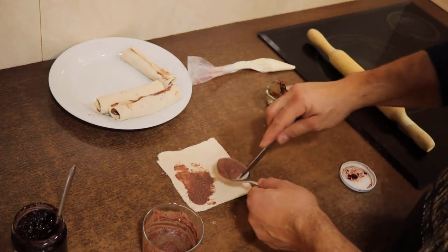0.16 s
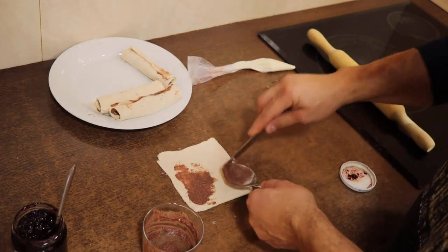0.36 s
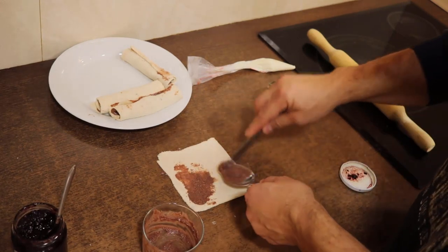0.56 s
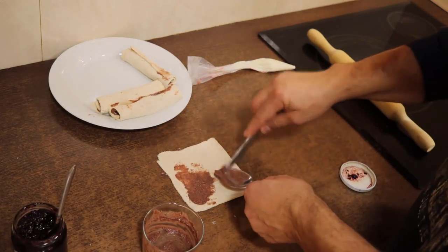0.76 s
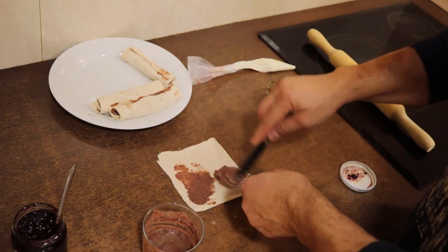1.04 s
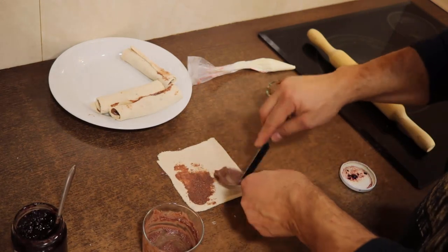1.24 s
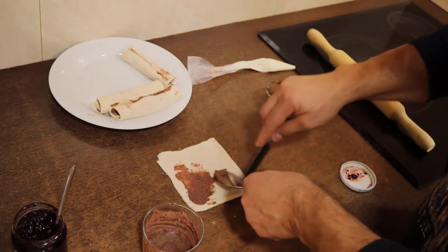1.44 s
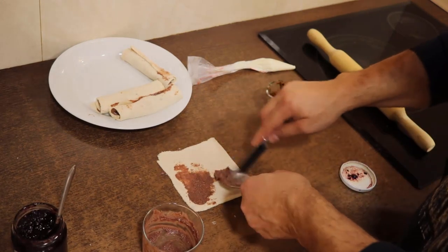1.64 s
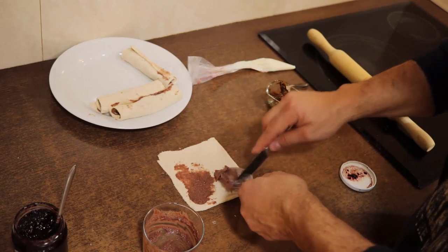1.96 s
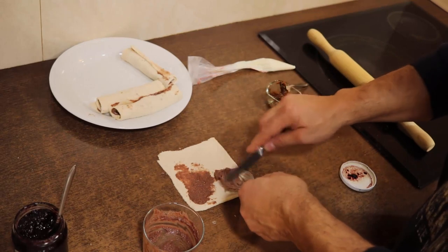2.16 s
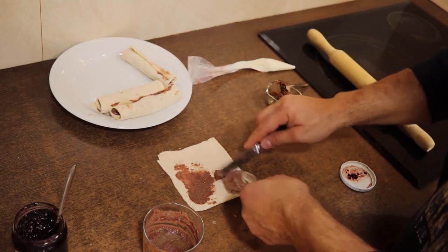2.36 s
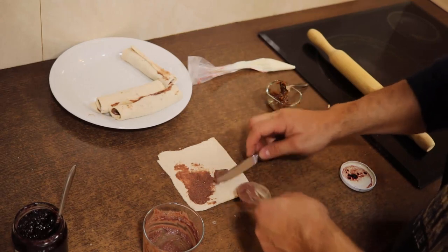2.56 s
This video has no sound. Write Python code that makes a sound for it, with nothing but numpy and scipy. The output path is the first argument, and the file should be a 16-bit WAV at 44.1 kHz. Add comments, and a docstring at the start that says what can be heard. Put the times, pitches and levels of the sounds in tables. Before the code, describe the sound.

Metal blade against hand-held spoon: a single clack and scrape, a brief pause, then a steady run of crisp, damped clacks with gritty drags; faint room rumble and hiss, hard-walled kitchen, close microphone.

```python
"""A knife taps and scrapes a spread off a hand-held metal spoon, over steady faint rumble and hiss.
First come faint taps and scrapes, a stronger tap and scrape at 0.2 s, then from half a second on
quick strokes, and last a soft slide. Each tap is a short rattle of random clicks that rings the damped
steel, with a dull thud; each slide is clumpy grit that swells, fades and rings the steel too. A hard-walled
kitchen answers with fading noise; the loudest peaks are softly rounded to keep the sum within range."""
import sys
import numpy as np
from scipy import signal
from scipy.fft import rfft, irfft
from scipy.io import wavfile

SR = 44100
rng = np.random.default_rng(int(sys.argv[2]) if len(sys.argv) > 2 else 0)


def bounce(signal):
    """Save signal as a 16-bit WAV file at the path given by the first command-line argument."""
    frames = np.transpose(np.atleast_2d(signal))
    limited = np.clip(frames, -1, 1)
    pcm = np.round(limited * 32767).astype(np.int16)
    wavfile.write(sys.argv[1], SR, pcm)


N = 119070  # length of the scene in samples

# pitches at which the colour of a stroke is set: (pitch [Hz])
COLOUR_PITCHES = [300, 1050, 2000, 3000, 4100, 6500, 13000]
# taps of blade on spoon; levels are relative: (start [s], level [dB], colour at 300 Hz [dB],
# at 1050 Hz [dB], at 2000 Hz [dB], at 3000 Hz [dB], at 6500 Hz [dB], at 13000 Hz [dB],
# own ring pitch [Hz], own ring level [dB], own ring time to fall 60 dB [s], thud level [dB])
TAPS_ON_SPOON = [(0.0897, -46, -1, -3, -10, -20, 0, 10, 2860, 8.5, 0.011, -78),
                 (0.1034, -47, -1, -7, -8, -20, 3, 1, 2860, 12, 0.021, -76),
                 (0.2032, -9.5, -9, -22, -16, -14, 8, -4.5, 3140, 4, 0.015, -78),
                 (0.5167, -3.5, -6, -40, -30, 5, -0.5, -2, 3920, 1, 0.025, -42.5),
                 (0.5667, -7, -7, -30, -22, 7, 2.5, 5.5, 5880, -2, 0.29, -49.5),
                 (0.7363, -2.5, -5, -39, -14, 8.5, 1, 6, 3910, 3, 0.013, -46.5),
                 (0.9179, -1, -12, -3, -3, 1, -2.5, 0, 6080, -2.5, 0.0079, -45.5),
                 (1.1071, -9, 13, 8.5, -9, -11, 5.5, 1.5, 3720, 2, 0.014, -56),
                 (1.282, -8, 8, -27, -13, 2, 2, 7.5, 3700, 6, 0.0036, -47.5),
                 (1.4726, -6.5, -14, -18, -30, -4, 1.5, 8.5, 3800, 5.5, 0.0016, -57),
                 (1.6643, -1, -2, -39, -47, 7.5, 1.5, -1.5, 4260, 1, 0.018, -52),
                 (1.8326, -8.5, -7, -3, 9, -4, 4.5, 7, 3760, -0.5, 0.025, -52),
                 (2.0089, -3.5, -8, -31, -27, 1, 2.5, 2, 4200, 1, 0.013, -58),
                 (2.187, -1, 7, -38, -20, -1, -2, 3.5, 4400, 2.5, 0.01, -47),
                 (2.3859, -10.5, 0, 6, 4, 1, -10, 13, 5410, -2.5, 0.0094, -80)]
# slides of the blade; levels are relative: (start [s], rise [s], fall to a tenth [s], level [dB],
# colour at 300 Hz [dB], at 1050 Hz [dB], at 2000 Hz [dB], at 3000 Hz [dB], at 6500 Hz [dB],
# at 13000 Hz [dB], bowl ring pitch [Hz])
BLADE_SLIDES = [(0.085, 0.017, 0.028, -55, 10, 20, 14, 8, 1, 18.5, 1170),
                (0.1537, 0.00058, 0.012, -51.5, 21, 33.5, 7, 14, -16, -10, 1150),
                (0.222, 0.033, 0.095, -19.5, -16, 4, 0.5, 6.5, -5.5, -5, 1163),
                (0.321, 0.016, 0.09, -36, -8, 12, -2, 9.5, 5, -1.5, 1066),
                (0.523, 0.0042, 0.016, -31.5, 0, 22, 9, 15, -13, -12, 1123),
                (0.57, 0.0041, 0.3, -32.5, -3, 2.5, 0.5, -11, -3, -1.5, 1070),
                (0.752, 0.065, 0.1, -38.5, 16.5, 7.5, -2, 8, 6, 3, 1030),
                (0.924, 0.0053, 0.046, -30, 4, 13.5, -6, 7, -13, 9, 1106),
                (0.958, 0.02, 0.072, -26, 10, 10, -3, 4.5, 1.5, 2, 1120),
                (1.112, 0.0059, 0.06, -33, 1, 11.5, 7.5, 20, 6.5, 9.5, 1030),
                (1.142, 0.018, 0.06, -21.5, 7, 4.5, -5, -8, 0.5, 0, 1054),
                (1.3, 0.04, 0.053, -39.5, 10, 6, 5.5, 2.5, 3, 7, 1110),
                (1.491, 0.036, 0.066, -38.5, 2, 0.5, -1, 6, 1.5, 7, 1110),
                (1.681, 0.033, 0.11, -33.5, -3, 9.5, -1, -7, 0, -1.5, 1150),
                (1.84, 0.016, 0.057, -27, 2, 6, -0.5, 5.5, 5, -1, 1114),
                (1.873, 0.016, 0.066, -29.5, 6, 6, 0, -4, 3.5, -1, 1120),
                (2.033, 0.013, 0.12, -27, 1, 5, 2.5, -3.5, 2.5, 2.5, 1125),
                (2.197, 0.02, 0.16, -29.5, 7, 5.5, 4.5, 0, 6, 2, 1110),
                (2.388, 0.0023, 0.035, -24, 2, 8, -3.5, -4.5, 5, -9, 1180),
                (2.643, 0.025, 0.38, -48.5, 5, 20.5, 11, -9.5, -7, -24, 1076)]
# ringing tones of spoon and blade, before the grip damps them:
# (pitch [Hz], relative level [dB], time to fall 60 dB [s])
STEEL_RINGS = [(1790, -4, 0.023), (1960, -34, 0.0061), (3180, -14.5, 0.035), (3590, 0.5, 0.027),
               (3970, -29, 0.0089), (4450, -15.5, 0.009), (6170, -3.5, 0.022), (6790, -11.5, 0.01)]
# broad colour of the contact itself: (pitch [Hz], relative level [dB])
CONTACT_COLOUR = [(40, -14), (150, -25), (500, -66), (1100, -18.5), (2000, -7.5), (4000, 4), (7000, -1.5),
                  (10000, -3), (13000, -13.5), (16000, -2)]
# dull ring of hand and counter: (pitch [Hz], relative level [dB], time to fall 60 dB [s])
THUD_RINGS = [(57, 10, 0.038), (110, 6.5, 0.035)]
# how fast the kitchen's echoes die: (pitch [Hz], time to fall 60 dB [s])
ECHO_FADE = [(60, 0.032), (300, 0.83), (1400, 0.56), (3700, 0.43), (9700, 0.36), (16000, 0.087)]
# how much of the echo both sides have in common: (pitch [Hz], relative weight [no unit])
ECHO_SHARED = [(60, 0.5), (300, 0.066), (1200, 0.96), (3000, 0.061), (8000, 0.063)]
# colour of the room's rumble and hiss: (pitch [Hz], relative level [dB])
ROOM_TONE_COLOUR = [(18, -36), (30, -7), (280, -10.5), (319, -7.5), (426, -9.5), (1280, -17), (6380, -24),
                    (13700, -36), (16000, -41)]
# loudness of the recorder's left side against its right: (pitch [Hz], left minus right [dB])
SIDE_BALANCE = [(60, -0.5), (110, 1.5), (200, -0.5), (380, -1.5), (700, 1.5), (1290, 2), (2380, 0),
                (4400, -1), (8120, 0.5), (15000, -3)]
# timing of the recorder's left side against its right: (pitch [Hz], left leads by [radians])
SIDE_LEAD = [(0, 0), (1890, 0.5), (3360, 0.4), (3700, -1.5), (5860, 1.77), (7060, 5.5), (7750, 6),
             (8870, -5), (16500, -6.5)]
BAND_EDGES_HZ = 34 * 2 ** np.arange(0, 9.4, .5)  # half-octave steps

TAP_DB, RATTLE_PER_S, RATTLE_T60_S = -10.5, 5600, 0.033
FIRST_CLICK = 4.46  # extra height of the click that opens each tap, against the rattle
GRIT_PER_S, GRIT_SPREAD_DB, GRIT_CLUMP_DB = 5000, 2.5, 2
UNLIKE = 0.84  # weight of the part of each click that is opposite left and right
CONTACT_DB = 3.5
BOWL_HZ, BOWL_DB = 1126, -31.5  # lowest ring of the spoon's bowl; each slide has its own pitch
STEEL_DB = -27.5
STEEL_SPREAD_DB, STEEL_WANDER = 2, .01  # typical change per stroke: level, share of the pitch
LONGEST_T60_S = .022  # the grip damps bowl and steel rings at least this fast
GRIP_DB = -11.5  # each tap's own ring, which depends on grip and load
ROOM_DB, ROOM_BUILD_S = -3, 0.0067
RINGS_TO_ROOM_DB = -13  # the rings reach the walls more weakly than the crunch
ROOM_TONE_DB = -56.5
ROUNDING = .75  # no peak passes this height when rounded
CUTOFF_HZ = 16300


def strokes():
    """Each tap is a fading rattle and each slide a swell of grit: (first sample, clicks, colour)."""
    moves = []
    rattle = grains(RATTLE_PER_S, 2.9)
    clumps = np.repeat(rng.standard_normal(N // 100 + 1), 100)[:N]  # a new strength every 100 samples
    grit = grains(GRIT_PER_S, GRIT_SPREAD_DB) * from_db(GRIT_CLUMP_DB * clumps)
    for start, db, *colour, _, _, _, _ in TAPS_ON_SPOON:
        first = int(start * SR)
        t = np.arange(SR // 6) / SR
        clicks = rattle[:, first:first + len(t)] * from_db(-60 * t / RATTLE_T60_S)
        clicks = clicks + FIRST_CLICK * (t == 0)
        moves.append((first, from_db(db + TAP_DB) * clicks, colour))
    for start, rise, fall, db, *colour, _ in BLADE_SLIDES:
        first = int(start * SR)
        t = np.arange(min(SR // 4, N - first)) / SR
        swell = np.minimum(t / rise, 1) ** 2
        fade = from_db(-20 * np.maximum(t - rise, 0) / fall)
        moves.append((first, from_db(db) * swell * fade * grit[:, first:first + len(t)], colour))
    return moves


def contact_crunch(moves):
    """The contacts themselves sound as a broad crunch, coloured band by band."""
    crunch = np.zeros((2, N))
    for k, (hz, band) in enumerate(bands()):
        level = from_db(CONTACT_DB + at_hz(CONTACT_COLOUR, hz))
        flip = (-1) ** k  # every other band is flipped so that neighbours join smoothly
        crunch += flip * level * signal.sosfilt(band, force_at(moves, hz))
    return crunch


def steel_rings(moves):
    """The clicks set bowl and blade ringing, a little differently at each stroke."""
    out = np.zeros((2, N))
    chance = rng.standard_normal((len(moves), len(STEEL_RINGS), 2))
    bowl_pitches = [BOWL_HZ] * len(TAPS_ON_SPOON) + [row[-1] for row in BLADE_SLIDES]
    for (first, clicks, colour), draws, bowl_hz in zip(moves, chance, bowl_pitches):
        bowl_level = from_db(BOWL_DB + colour_db(colour, bowl_hz))
        rings = bowl_level * ring(clicks, bowl_hz, LONGEST_T60_S)
        for (hz, db, t60), (shift, spread) in zip(STEEL_RINGS, draws):
            level = from_db(db + STEEL_DB + colour_db(colour, hz) + STEEL_SPREAD_DB * spread)
            moved_hz = hz * (1 + STEEL_WANDER * shift)
            rings += level * ring(clicks, moved_hz, min(t60, LONGEST_T60_S))
        out[:, first:first + clicks.shape[1]] += rings
    # the taps come first among the moves, so this pairs each tap with its own row
    for (first, clicks, _), row in zip(moves, TAPS_ON_SPOON):
        own_hz, own_db, own_t60, _ = row[-4:]
        own_ring = from_db(GRIP_DB + own_db) * ring(clicks, own_hz, own_t60)
        out[:, first:first + clicks.shape[1]] += own_ring
    return out


def force_at(moves, hz):
    """The clicks of all strokes add up, each as strong as its colour makes it at one pitch."""
    force = np.full((2, N), 1e-18)
    for first, clicks, colour in moves:
        force[:, first:first + clicks.shape[1]] += clicks * from_db(colour_db(colour, hz))
    return force


def colour_db(colour, hz):
    """A stroke's colour at one pitch, read between its settings; 0 dB at 4100 Hz."""
    return np.interp(np.log(hz), np.log(COLOUR_PITCHES), [*colour[:4], 0, *colour[4:]])


def grains(rate, spread_db):
    """Rough surfaces touch in random clicks of uneven size and sign, partly unlike left and right."""
    sizes = from_db(spread_db * np.minimum(rng.exponential(1, N), 5))
    sizes = sizes * (rng.random(N) < rate / SR)
    shared, opposite = rng.choice([-1, 1], (2, N))
    return rms_one(sizes * (shared + UNLIKE * opposite * np.array([[1], [-1]])))


def ring(force, hz, t60):
    """Struck metal swings and dies away: a unit click starts a fading sine of height 1."""
    shrink = from_db(-60 / (t60 * SR))  # loss per sample
    turn = 2 * np.pi * hz / SR
    return signal.lfilter([0, np.sin(turn)], [1, -2 * shrink * np.cos(turn), shrink ** 2], force)


def thuds():
    """Each tap jolts hand and counter, which answer with short low rings."""
    jolts = np.full(N, 1e-18)
    for row in TAPS_ON_SPOON:
        jolts[int(row[0] * SR)] = from_db(row[-1])
    return sum(from_db(db) * ring(jolts, hz, t60) for hz, db, t60 in THUD_RINGS)


def kitchen(x):
    """Hard walls return dense echoes that build up, then die band by band, unlike on each side."""
    t = np.arange(SR // 2) / SR
    white = rng.standard_normal((2, 3, len(t)))  # two sets for alternate bands: left, right, shared
    echoes = np.zeros((2, len(t)))
    for k, (hz, band) in enumerate(bands()):
        noise = white[k % 2, :2] + at_hz(ECHO_SHARED, hz) * 2 * white[k % 2, 2]
        echoes += signal.sosfilt(band, noise) * from_db(-60 * t / at_hz(ECHO_FADE, hz))
    echoes = echoes * (1 - np.exp(-(t / ROOM_BUILD_S) ** 2))
    return signal.fftconvolve(x, rms_one(echoes) / np.sqrt(len(t)), axes=1)[:, :N]


def room_tone():
    """Faint steady rumble and hiss, made of coloured noise partly shared by both sides."""
    white = rng.standard_normal((2, 3, N))  # two sets for alternate bands: left, right, shared
    noise = np.zeros((3, N))
    for k, (hz, band) in enumerate(bands()):
        noise += from_db(at_hz(ROOM_TONE_COLOUR, hz)) * signal.sosfilt(band, white[k % 2])
    return from_db(ROOM_TONE_DB) * rms_one(noise[:2] + 0.72 * noise[2])


def from_db(db):
    """Turn decibels into a plain factor."""
    return 10 ** (np.asarray(db) / 20)


def rms_one(x):
    """Scale a sound to an average strength (rms) of 1."""
    return x / np.sqrt(np.mean(x ** 2) + 1e-20)


def at_hz(points, hz):
    """Read a table between its pitches, which are spaced as the ear hears them (log)."""
    points = np.array(points)
    pitches = np.maximum(points[:, 0], 1e-300)  # a pitch of 0 has no logarithm
    return np.interp(np.log(hz), np.log(pitches), points[:, 1])


def bands():
    """Split the pitch range into half-octave filters, each with its middle pitch."""
    return [(np.sqrt(low * high), signal.butter(2, [low, high], "band", fs=SR, output="sos"))
            for low, high in zip(BAND_EDGES_HZ, BAND_EDGES_HZ[1:])]


def scene():
    """Crunch, thuds and rings are heard directly and through the room, over the room tone."""
    moves = strokes()
    rings = steel_rings(moves)
    near = contact_crunch(moves) + thuds()
    echoes = from_db(ROOM_DB) * kitchen(near + from_db(RINGS_TO_ROOM_DB) * rings)
    return near + rings + echoes + room_tone()


def record(dry):
    """The two sides differ in colour and phase; peaks are softly rounded to stay in range; the top is cut."""
    hz = np.maximum(np.fft.rfftfreq(N, 1 / SR), 20)
    side = np.array([[1], [-1]])  # each side takes half of the difference
    colour = from_db(at_hz(SIDE_BALANCE, hz) / 2 * side)
    phase = np.exp(.5j * at_hz(SIDE_LEAD, hz) * side)
    two_sides = irfft(rfft(dry) * colour * phase, N)
    rounded = ROUNDING * np.tanh(two_sides / ROUNDING)
    return signal.sosfilt(signal.cheby2(14, 60, CUTOFF_HZ, fs=SR, output="sos"), rounded)


dry = scene()
out = record(dry)
bounce(out)
```